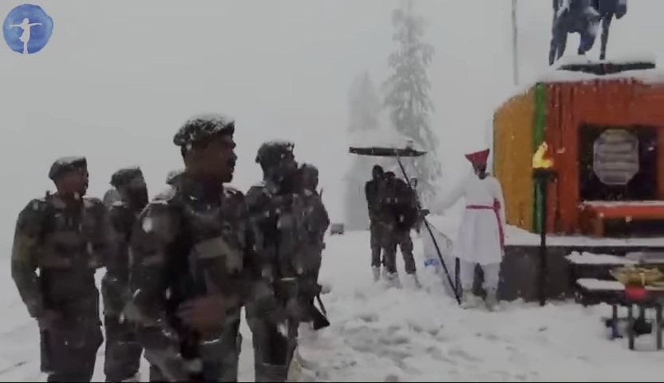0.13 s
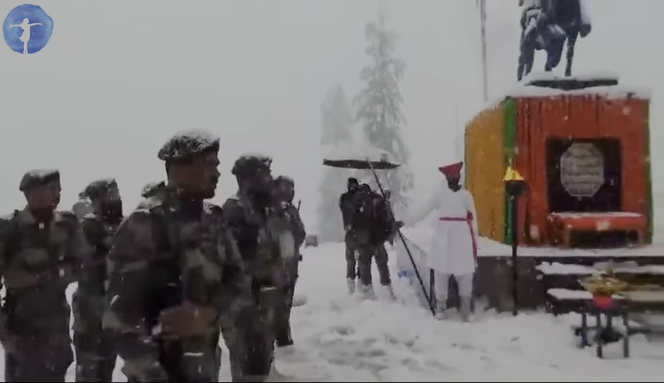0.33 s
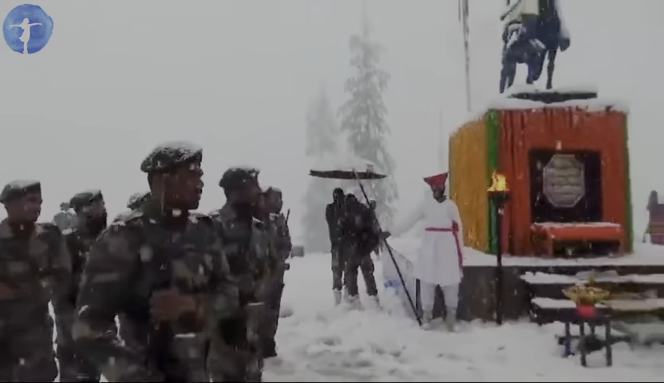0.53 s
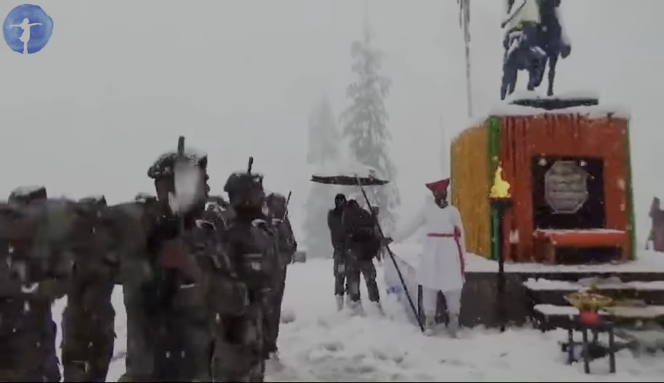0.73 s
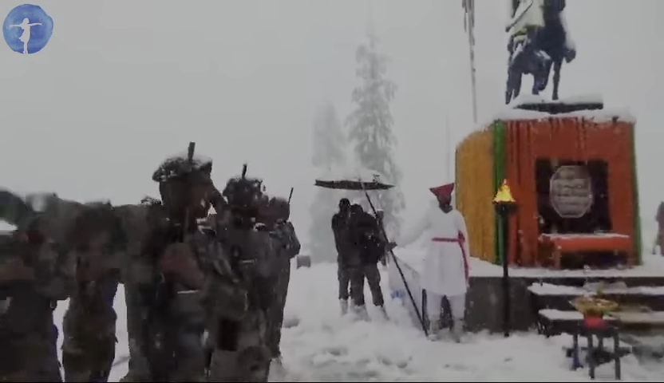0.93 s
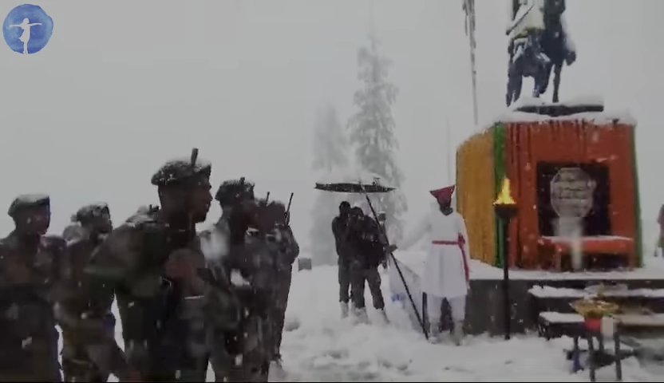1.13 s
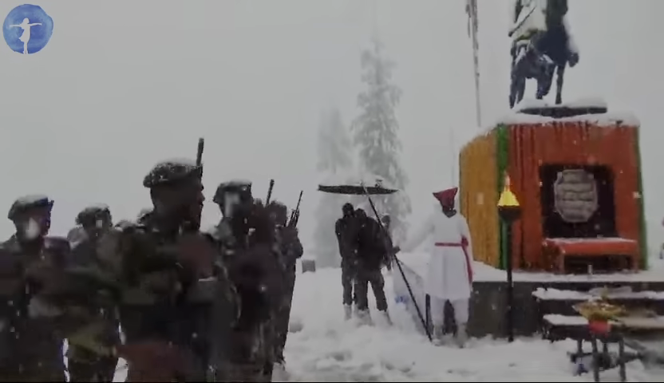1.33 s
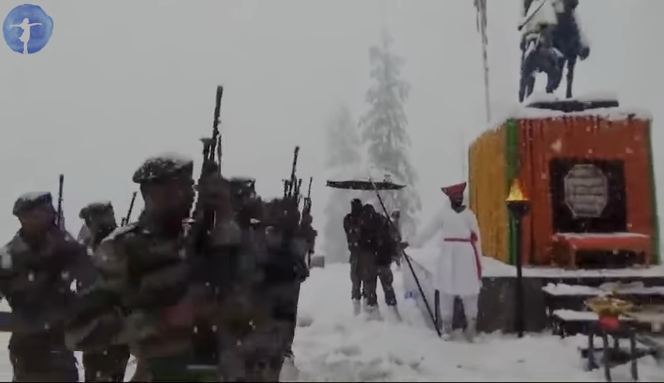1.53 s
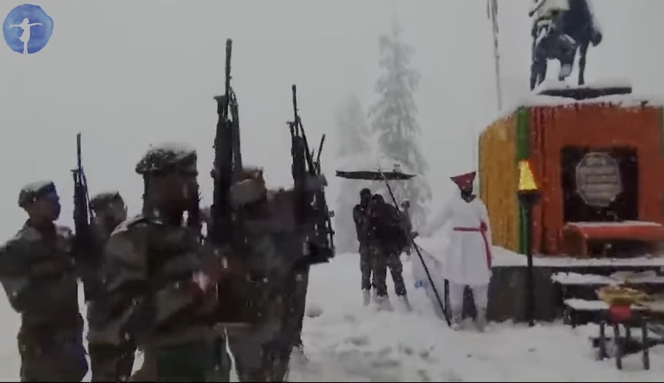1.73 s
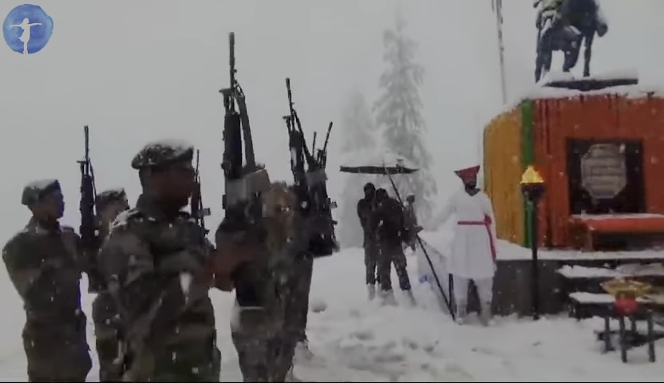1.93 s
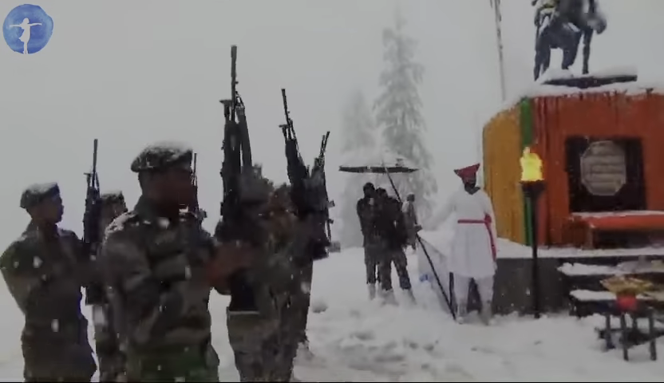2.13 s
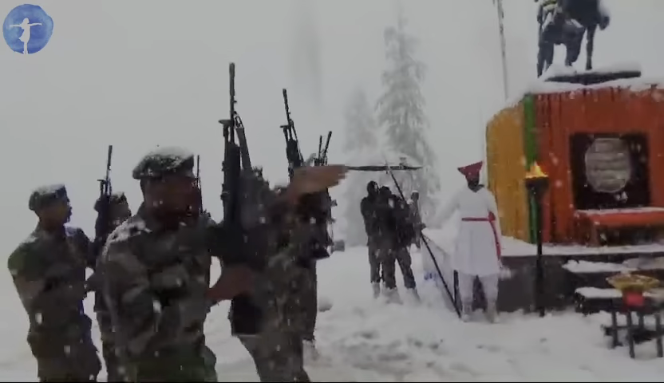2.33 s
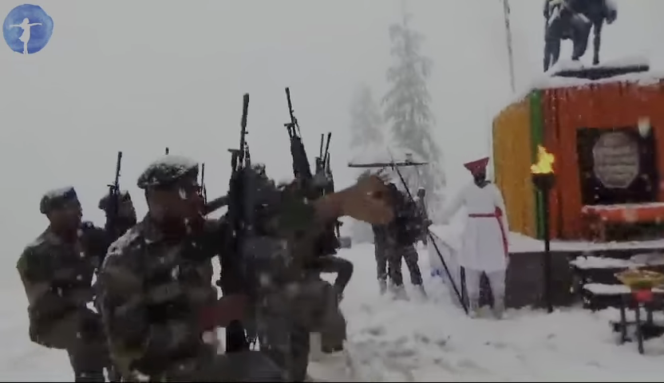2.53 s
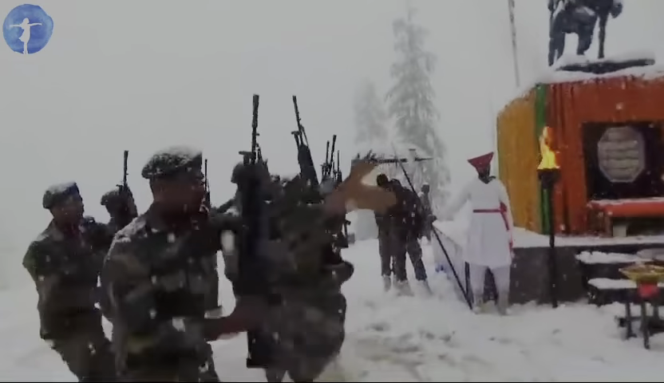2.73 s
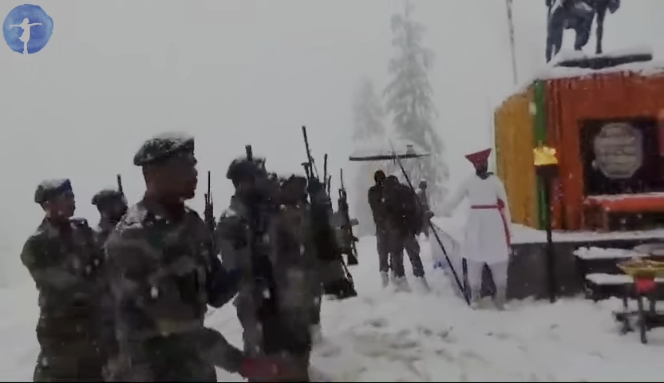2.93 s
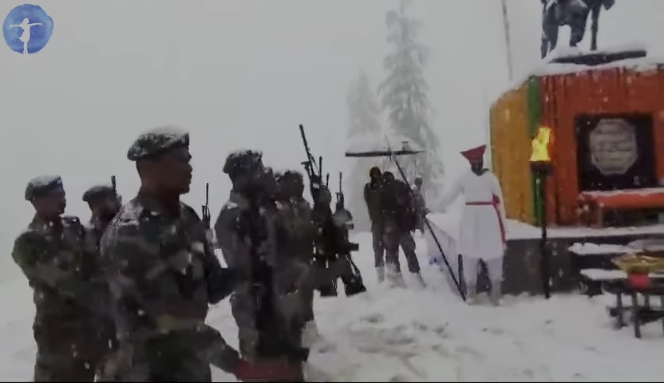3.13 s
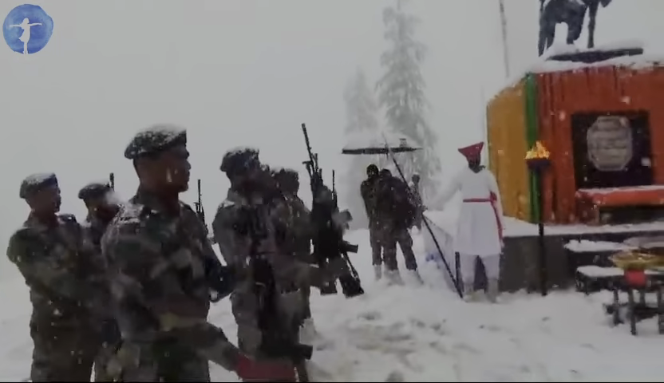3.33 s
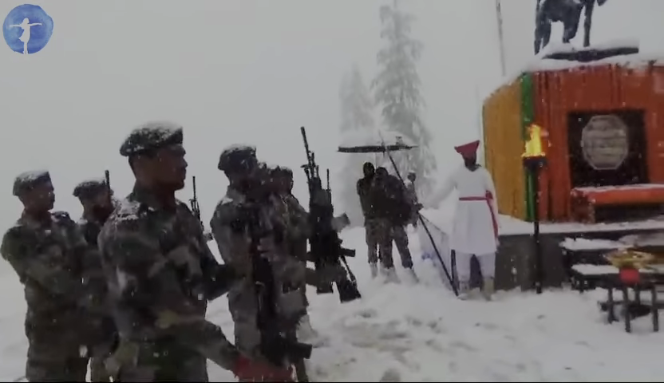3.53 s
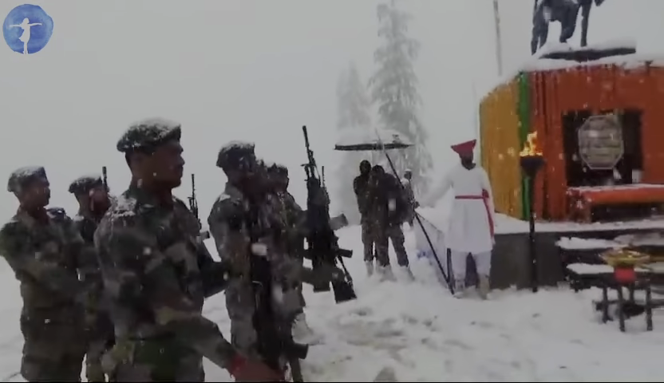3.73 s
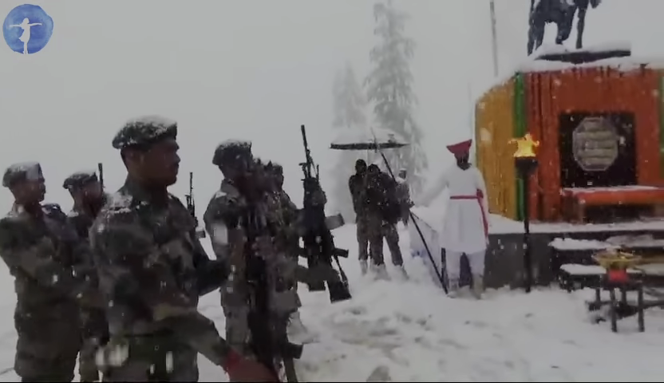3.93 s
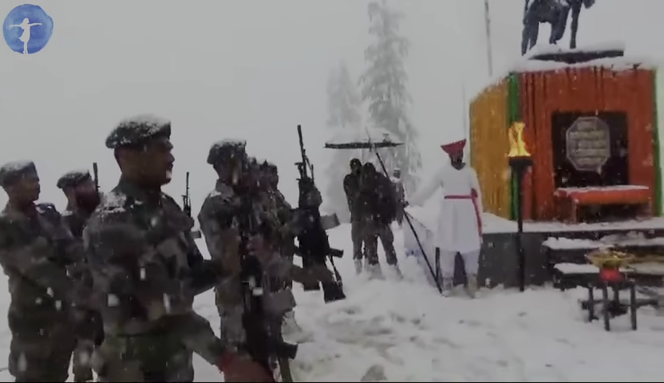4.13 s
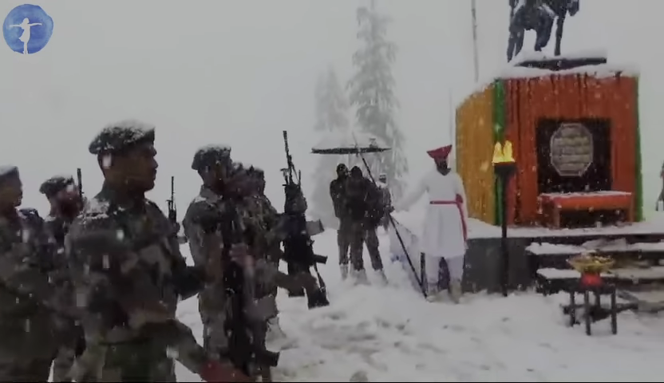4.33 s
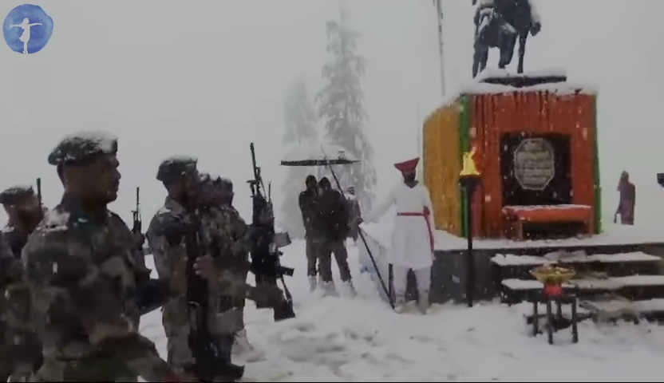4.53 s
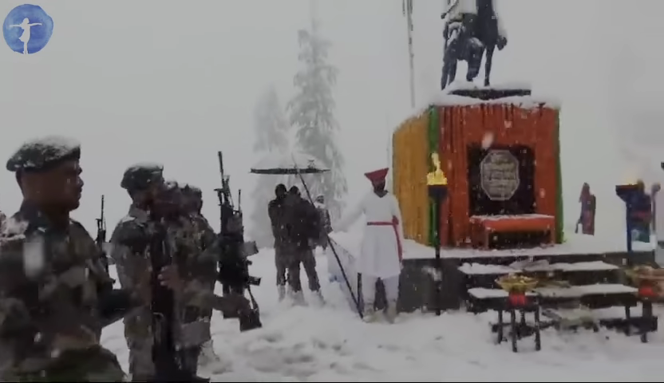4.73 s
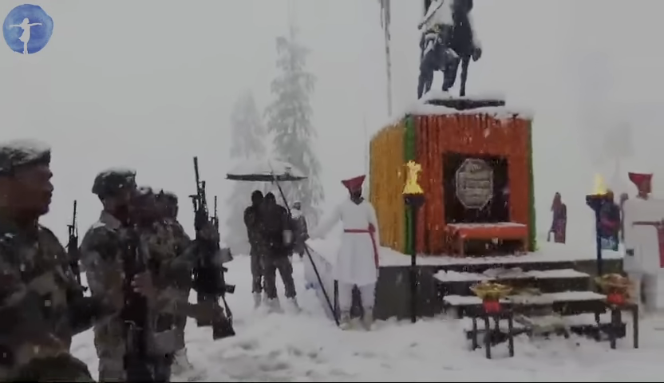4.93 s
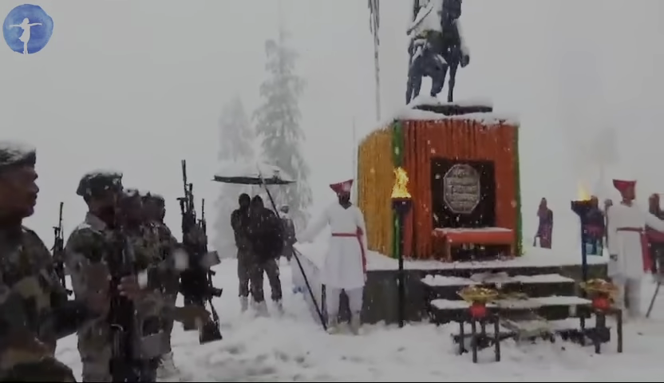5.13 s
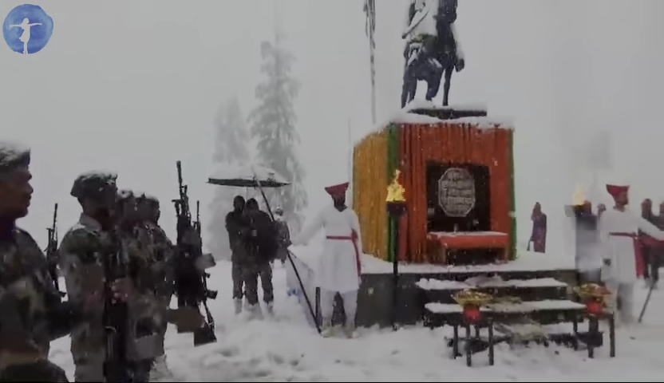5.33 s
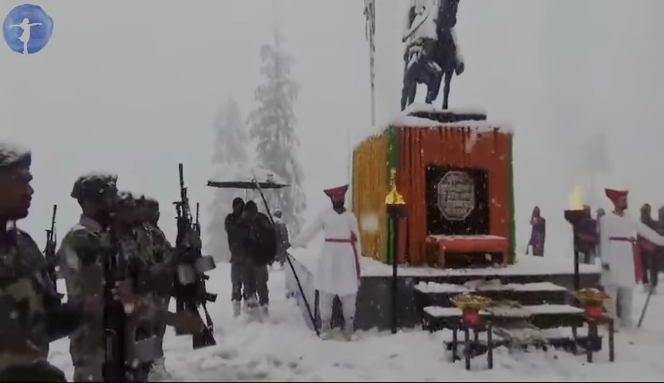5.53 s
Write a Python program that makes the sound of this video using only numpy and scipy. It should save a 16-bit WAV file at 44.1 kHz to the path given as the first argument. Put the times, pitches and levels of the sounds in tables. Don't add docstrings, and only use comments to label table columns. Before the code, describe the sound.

Several soldiers on packed snow perform a rifle drill: four dense clusters of hard hand slaps, hollow stock knocks and loose metal rattle, with small buckle ticks and cloth rustle between. The last cluster ends in a heavy boot thud. After that only light ticks, faint hiss and a low distant drone remain. Close small stereo microphone, dry, almost no echo, slightly rounded peaks.

```python
import sys
import numpy as np
from scipy import signal
from scipy.fft import rfft, irfft
from scipy.io import wavfile
from scipy.ndimage import uniform_filter1d

SR = 44100
rng = np.random.default_rng(int(sys.argv[2]) if len(sys.argv) > 2 else 0)


def dump_mix(stems):
    frames = np.atleast_2d(stems).T
    limited = np.clip(frames, -1, 1)
    pcm = np.round(limited * 32767).astype(np.int16)
    wavfile.write(sys.argv[1], SR, pcm)


def convert_level_to_amplitude(level_db):
    exponent = np.asarray(level_db, float) / 20
    return 10 ** exponent


N = 245627

# f/Hz, density/dB per Hz
AIR_SPECTRUM = [(15, -39), (25, -1.5), (64, 2), (110, -6.5), (165, -4.5), (505, -10), (1140, -11),
                (1510, -15.5), (1760, -14), (2210, -17.5), (4510, -22.5), (8100, -21), (11000, -28.5),
                (14300, -49), (22000, -120)]
# f/Hz, side minus mid/dB
AIR_WIDTH = [(60, -30), (110, -15), (190, -16.5), (350, -9.5), (630, -6), (1120, -3.5), (2020, -3),
             (3630, -2.5), (6530, -5), (11700, -9)]
# f/Hz, width/Hz, level/dB
GENERATOR_MODES = [(64.4, 6, -67), (94, 65, -69), (130, 9.9, -74), (211, 76, -65)]
# t/s, hiss level/dB, drone level/dB
BACKGROUND_GAIN = [(0, -5, -17), (.5, -5, -14), (1.0, -3, -4), (2.0, -1.5, -24), (2.7, 0.5, -11),
                   (3.3, -0.5, 0.5), (3.9, -2, 4.5), (4.401, -1, -10), (5.57, -1.5, 3)]
# t/s, level/dB
CLOTH_MOTION = [(0, -49.5), (.06, -56), (.28, -51), (.76, -49.5), (1.01, -62.5), (1.21, -35), (1.33, -59),
                (1.5, -50.5), (1.7, -43.5), (1.95, -49), (2.45, -36.5), (2.75, -49), (2.93, -32),
                (3.19, -51), (3.85, -60), (4.25, -55), (4.65, -62), (5.1, -55)]
# t/s, bright minus dull/dB
SLING_RUB = [(1.4, 2), (1.65, 4), (1.8, -7), (2.2, 8), (3.0, 3), (3.3, 13)]

# f/Hz, width/Hz, level/dB
GROUND_MODES = [(110, 68, -7), (155, 61, -2.5), (257, 157, 2), (426, 180, -3)]
STOCK_MODES = [(600, 214, 2), (684, 58, 6.5), (766, 94, 1), (865, 68, 1.5)]
PALM_MODES = [(1020, 500, -1.5), (1530, 335, -2), (1782, 694, -5)]
CRACK_MODES = [(2240, 1400, -4.5), (3000, 1030, -1.5), (4180, 1480, -4.5)]
RATTLE_MODES = [(5270, 2040, -4.5), (7530, 2450, 1), (8050, 1830, 5), (10600, 5200, -9)]
SWIVEL_MODES = [(4600, 1300, 2.5), (5900, 1300, -5), (7770, 1180, 8), (9750, 3700, -4.5)]
SNAP_MODES = [(4700, 2800, -2.5), (7850, 2300, 1), (10100, 3400, 1.5)]

# t/s, level/dB, f/Hz, sizzle relative level/dB
GEAR_TICKS = [(0.44, -24.5, 1450, -17), (0.4561, -24, 1220, -40), (0.497, -34, 1460, -30),
              (.5582, -32, 1790, -16), (0.5859, -30, 1370, -9.5), (0.661, -35, 1460, -8),
              (0.7502, -33, 1400, -27.5), (0.8003, -36, 1300, -11), (0.8368, -24, 1500, -10),
              (1.419, -31, 1580, -14), (1.592, -27, 1240, -7), (1.65, -29, 1370, -5.5),
              (1.7903, -33, 1450, -22), (1.895, -24.5, 1435, -15), (1.922, -34.5, 1560, 2.5),
              (1.995, -33.5, 1200, -10), (2.735, -31, 1446, -11), (3.1393, -27, 1170, -9.5),
              (3.203, -33.5, 1450, -19), (3.29, -41, 1900, -7), (3.333, -38.5, 1660, -4),
              (3.536, -39.5, 1900, 2), (4.1322, -34.5, 1680, -12),
              (.5407, -32.5, 2270, -27), (0.613, -29.5, 3130, -12), (.624, -27, 3370, -7),
               (.7863, -32, 2100, -27), (1.0123, -29.5, 3000, -18), (1.041, -32, 3010, -8),
               (1.3524, -35.5, 2110, 4), (1.371, -33, 2200, -28), (1.516, -25.5, 3160, -19),
               (1.5425, -20.5, 2970, 1), (1.5473, -14.5, 3050, -4.5), (1.6771, -15, 3000, -15.5),
               (1.715, -14, 2970, -13.5), (1.7307, -20, 3400, -25), (1.8037, -24.5, 3350, -18),
               (1.9127, -28, 2900, -14), (2.34, -19.5, 2960, -14), (2.592, -16, 3000, -5.5),
               (2.6247, -32, 3100, -6), (2.646, -29.5, 2260, -24), (3.213, -33.5, 2170, -14),
               (3.426, -36.5, 3510, -8), (3.463, -39, 3180, -3), (3.4803, -33.5, 2420, -3.5),
               (4.3894, -41, 2830, -16), (4.4842, -40.5, 3460, -6), (4.9555, -39.5, 3400, -7),
               (5.534, -39, 2450, -5)]
# t/s, level/dB, f/Hz, T60/s
STOCK_RINGS = [(0.1532, -22, 880, 0.038), (0.1552, -18, 661, 0.034), (0.229, -36, 690, 0.038),
               (0.2958, -40, 735, 0.022), (0.3317, -35, 593, 0.022), (0.9284, -36.5, 730, 0.02),
               (0.9823, -38.5, 720, 0.032), (1.1509, -17, 703, 0.028), (1.1728, -26, 716, 0.02),
               (1.2068, -21.5, 665, 0.11), (1.2197, -16, 667, 0.019), (1.2377, -31, 703, 0.09),
               (1.554, -30, 802, 0.024), (1.6039, -33, 674, 0.031), (1.6198, -30, 670, 0.025),
               (1.6378, -32, 800, 0.02), (1.6617, -37.5, 753, 0.057), (1.6887, -32.5, 653, 0.024),
               (1.7615, -40, 700, 0.022), (1.7914, -37, 713, 0.022), (1.8114, -35, 680, 0.022),
               (1.8323, -43, 660, 0.045), (1.8503, -25, 727, 0.016), (1.9361, -39.5, 670, 0.022),
               (2.0419, -25, 722, 0.17), (2.0588, -18, 730, 0.017), (2.0608, -14, 974, 0.016),
               (2.0748, -15, 864, 0.027), (2.0977, -18, 616, 0.024), (2.0997, -26, 842, 0.13),
               (2.1107, -15, 794, 0.022), (2.1317, -28, 875, 0.02), (2.1466, -23, 640, 0.021),
               (2.1476, -22, 824, 0.025), (2.1596, -24.5, 686, 0.059), (2.2953, -44, 690, 0.052),
               (2.3162, -25.5, 876, 0.017), (2.4459, -22, 737, 0.038), (2.4779, -42, 704, 0.067),
               (2.4958, -28, 767, 0.023), (2.5208, -20, 693, 0.021), (2.7792, -32.5, 653, 0.022),
               (2.8321, -41.5, 724, 0.15), (2.868, -24, 646, 0.031), (2.8849, -26, 817, 0.022),
               (2.9019, -22, 860, 0.027), (2.9109, -15.5, 660, 0.034), (2.9658, -24.5, 690, 0.024),
               (2.9777, -28, 680, 0.022), (3.278, -48, 700, .03), (3.405, -55, 720, .03),
               (3.53, -51, 726, 0.033)]
# t/s, level/dB, f/Hz, T60/s
MAGAZINE_RINGS = [(0.1202, -25, 1700, 0.022), (0.1222, -27, 1990, 0.02), (0.1532, -20.5, 2050, 0.025),
                  (0.1641, -22.5, 1264, 0.023), (0.1791, -24, 1990, 0.019), (0.1791, -21, 1530, 0.039),
                  (0.1801, -29, 1127, 0.066), (1.109, -23.5, 1106, 0.022), (1.1439, -24, 1150, 0.02),
                  (1.561, -29.5, 1110, 0.016), (1.6069, -32, 1190, 0.02), (1.6388, -37, 1560, 0.018),
                  (1.6488, -40, 1400, 0.036), (1.8842, -33, 1155, 0.03), (1.8852, -31.5, 1493, 0.02),
                  (2.0399, -21, 1170, 0.015), (2.0648, -15, 1574, 0.024), (2.1047, -15, 1590, 0.02),
                  (2.1207, -17, 1518, 0.035), (2.1396, -20.5, 1617, 0.04), (2.1506, -22, 1063, 0.027),
                  (2.1526, -23, 1830, 0.022), (2.1566, -22, 1580, 0.02), (2.1726, -22.5, 1850, 0.02),
                  (2.1736, -27, 1530, 0.023), (2.4439, -27, 1724, 0.039), (2.4439, -23.5, 1954, 0.021),
                  (2.4859, -32, 1550, 0.018), (2.855, -21, 2270, 0.018), (2.855, -21, 1584, 0.032),
                  (2.859, -22.5, 1197, 0.022), (2.8859, -20, 2080, 0.023), (2.9009, -23, 1100, 0.034),
                  (2.9009, -17.5, 1870, 0.021), (2.9338, -22, 1630, 0.017), (2.9358, -18, 1150, 0.02),
                  (2.9648, -25, 1537, 0.033), (2.9678, -23, 1230, 0.022), (2.9827, -26, 1060, 0.022)]
# t/s, level/dB, f/Hz, T60/s
CLINKS = [(.1561, -23, 3200, 0.028), (.8367, -40.5, 3790, 0.018), (1.116, -22, 2850, .02),
          (2.0419, -30, 2700, .022), (2.0439, -31, 3290, 0.021), (2.0798, -21, 2650, .022),
          (2.1177, -18, 3380, 0.024), (2.1287, -19, 3320, .02), (2.3162, -25, 3420, .022),
          (2.524, -42, 8060, .02), (2.624, -42, 7260, .05), (2.855, -27, 2880, .02),
          (1.117, -21, 720, 0.022), (1.127, -26, 630, .02), (1.226, -17.5, 690, .024),
          (1.594, -38, 1640, .02), (2.592, -27, 4320, .015), (1.8495, -28, 1010, .012),
          (2.594, -43, 645, .025), (2.679, -43.5, 1350, .02), (2.709, -45, 670, .02),
          (2.728, -44.5, 680, .035), (2.194, -36, 8070, .02)]
# t/s, level/dB, T60/s
METAL_SNAPS = [(.1575, -18.5, 0.052), (.255, -39.5, 0.046), (1.106, -14, .012), (1.543, -21, .01),
               (1.839, -39, .015), (2.0408, -12, 0.032), (2.194, -32, .02), (2.3182, -20.5, .02),
               (2.358, -32.5, 0.085), (2.592, -23, 0.0098), (2.936, -22, 0.017), (4.8474, -35.5, 0.023),
               (5.1098, -41.5, .01)]
# t/s, level/dB, f/Hz, T60/s, left minus right/dB
BOOT_THUDS = [(.161, -28, 183, 0.054, 1), (0.743, -48, 196, 0.14, 0.0), (0.927, -32, 142, 0.044, -0.5),
              (1.123, -23, 238, .04, -1), (1.151, -18, 228, 0.04, -3), (1.26, -42, 240, 0.048, 3),
              (2.315, -26, 170, 0.071, -1), (2.357, -33, 220, 0.076, -1), (2.4, -35.5, 110, 0.093, 0),
              (2.443, -23.5, 237, 0.03, -6), (2.493, -34, 113, 0.063, -1), (2.885, -16, 149, 0.06, 1),
              (2.92, -19, 114, .07, 1), (2.943, -23, 130, 0.052, 0), (2.9625, -4.5, 159, 0.03, -13),
              (2.983, -22, 127, 0.037, 4), (3.002, -25, 124, 0.053, -6), (3.018, -38, 155, 0.11, 3),
              (2.995, -27.5, 109, 0.11, -4.5), (2.05, -38, 109, 0.08, -2)]
# t/s, level/dB, f/Hz, T60/s, left minus right/dB
BUTT_THUDS = [(0.141, -14, 454, 0.032, 2), (0.146, -20.5, 520, 0.033, -12), (0.155, -23, 446, 0.047, -5),
              (0.179, -23.5, 457, 0.035, 1), (0.928, -32, 463, 0.029, 0.5), (1.112, -15.5, 400, 0.02, -3),
              (1.201, -23.5, 428, 0.049, 4), (1.546, -33.5, 294, 0.04, -0.5),
              (1.848, -33, 520, 0.027, -0.5), (2.038, -29.5, 354, 0.043, -0.5),
              (2.099, -23, 308, 0.038, -4), (2.156, -18, 308, 0.029, 1), (2.315, -25, 236, 0.054, 1),
              (2.908, -16, 302, 0.024, -18), (2.913, -10.5, 267, 0.038, -7), (2.939, -31, 440, 0.04, -3)]

# t/s, crack level/dB, stock relative level/dB, T60/s
GUARD_SLAPS = [(.1464, -15.5, -7, 0.051), (.1534, -12, -12, 0.046), (.1564, -8.5, -18, 0.046),
               (1.097, -15.5, -6, 0.037), (1.1134, -13, -6, 0.043), (1.1178, -8.5, -28, 0.057),
               (1.1268, -11, -2.5, 0.066), (1.154, -14, -10, 0.098), (1.1655, -7.5, -30, 0.03),
               (1.1834, -27, -4, 0.055), (1.202, -11.5, -11, .02), (1.2045, -14, -13, 0.081),
               (2.0444, -10, -10, 0.08), (2.0514, -12, -18, 0.14), (2.0772, -13.5, -4, 0.11),
               (2.0844, -13.5, 1, .08), (2.1094, -19, -8.5, 0.055), (2.1174, -8.5, -4.5, 0.08),
               (2.15, -13.5, -19, 0.062), (2.1574, -19, -10, .054), (2.194, -28, -14, 0.039),
               (2.2194, -34, -5, .026), (2.3078, -25.5, 3.5, 0.067), (2.3162, -14, -22, 0.036),
               (2.3522, -27.5, -19, 0.16), (2.898, -12, -14, 0.07)]
PALM_SLAPS = [(.1409, -15.5, -11, 0.048), (.179, -15.5, -4, 0.095), (1.1057, -12, -27, 0.046),
              (1.1334, -19, 4, .06), (1.1448, -13.5, -3.5, 0.097), (1.222, -24.5, 3.5, 0.12),
              (1.8499, -20.5, 3.5, 0.029), (2.0401, -14, -20, 0.048), (2.0618, -11.5, 1.5, 0.066),
              (2.0668, -11.5, -22, 0.1), (2.0984, -13, -15, 0.26), (2.164, -20, -2, 0.052),
              (2.174, -17.5, -12, 0.026), (2.4484, -21.5, 1.5, 0.051), (2.5197, -24, -2, 0.037),
              (2.9066, -14, 0, 0.093), (2.9164, -16, -10, 0.1), (2.9355, -13.5, -15, 0.06),
              (2.9657, -17.5, -13, 0.051), (2.9834, -26, -15, 0.093)]
TIGHT_GRIPS = [(.1212, -23, -5, 0.23), (1.175, -19, -10, 0.044), (1.258, -22, -5, 0.039),
               (1.5456, -21.5, -11, 0.056), (2.1071, -17, -11, .082), (2.1406, -11.5, -4, 0.054),
               (2.4945, -23.5, 2, 0.051), (2.856, -12, -19, 0.083), (2.3165, -19, -20, 0.02),
               (2.8862, -14.5, -0.5, 0.084), (2.9454, -17.5, -8, 0.12), (3.0394, -37, -9, 0.18),
               (3.075, -31, -27, 0.046), (2.4438, -17.5, -9, .032)]
REGRIPS = [(.217, -34.5, 10.5, 0.068), (.2512, -34.5, 4, 0.13), (.9816, -49.5, 14.5, 0.092),
           (1.5557, -37, 0.5, 0.033), (1.6042, -35, 2, .051), (1.6175, -35, 2, 0.078),
           (1.6382, -39, -5, 0.061), (1.6628, -42.5, 3, 0.068), (1.81, -47.5, 13.5, 0.21),
           (1.8834, -33.5, -14, 0.049), (2.7746, -45.5, 10, 0.089), (3.0044, -35, -16, 0.12) ]
# palm level/dB, rattle level/dB
GUARD_MIX, PALM_MIX = (-8.5, -8.5), (-2, -7)
TIGHT_MIX, REGRIP_MIX = (-3.5, -18), (4.2, -11)

AIR_DB = -52.5
TICK_T60_S, TICK_RING_DB, TICK_MUFFLE_PER_DB = 0.018, -6.5, -0.14
PORT_LAG_RAD, PORT_HZ = 0.56, 600
TOP_HZ = 11000
LEFT_RIGHT = np.array([[1], [-1]])


def level(x, db):
    return x * convert_level_to_amplitude(db) / np.sqrt(np.mean(x ** 2))


def ring(x, hz, width):
    return signal.lfilter(*signal.iirpeak(hz, hz / width, fs=SR), x)


def wander(hold, smooth):
    steps = np.repeat(rng.standard_normal(N // hold + 1), hold)
    return uniform_filter1d(steps, smooth)[:N]


def body(modes, drive, side_db, grit_db=0., snap_db=-90.):
    grit = np.repeat(rng.standard_normal(N // 40 + 1), 40)[:N]
    noise = rng.standard_normal((2, N)) * convert_level_to_amplitude(grit_db * grit)
    contact = np.maximum(np.diff(drive, 2, prepend=[0, 0]), 0)
    force = noise * drive
    force[0] += convert_level_to_amplitude(snap_db) * contact
    push = np.vstack([force, noise[:1]])
    total = 0
    for k, (hz, width, db) in enumerate(modes):
        mode = ring(ring(push, hz, 2 * width), hz, width)
        total = total + (-1) ** k * convert_level_to_amplitude(db) * mode
    mid, side, steady = total
    return (mid + convert_level_to_amplitude(side_db) * side * LEFT_RIGHT) / steady.std()


def blows(times, dbs, t60s, rise, tail_db):
    power, t = np.zeros(N + SR), np.arange(SR // 2) / SR
    for s, db, t60 in zip(times, dbs, t60s):
        t60 = max(t60, .005)
        fall = convert_level_to_amplitude(-120 * t / t60) + convert_level_to_amplitude(2 * tail_db - 120 * t / (3.9 * t60))
        start = int(s * SR)
        power[start:start + len(t)] += convert_level_to_amplitude(2 * db) * fall * np.minimum(t / rise, 1) ** 2
    return np.sqrt(power[:N])


def knocks(times, dbs, hzs, t60s, pan_dbs, rise):
    out, t = np.zeros((2, N + SR)), np.arange(SR // 4) / SR
    for s, db, hz, t60, pan_db in zip(times, dbs, hzs, t60s, pan_dbs):
        envelope = convert_level_to_amplitude(db - 60 * t / max(t60, .005)) * np.minimum(t / rise, 1)
        tone = np.sin(2 * np.pi * hz * t) * envelope
        start = int(s * SR)
        out[:, start:start + len(t)] += tone * convert_level_to_amplitude(pan_db / 2 * LEFT_RIGHT)
    return out[:, :N]


def outdoor_hiss():
    log_f = np.log(np.maximum(np.fft.rfftfreq(N, 1 / SR), 1))
    hz, db = np.transpose(AIR_SPECTRUM)
    colour = convert_level_to_amplitude(np.interp(log_f, np.log(hz), db))
    hz, db = np.transpose(AIR_WIDTH)
    apart = convert_level_to_amplitude(np.interp(log_f, np.log(hz), db))
    mid, side = irfft(rfft(rng.standard_normal((2, N))) * colour * np.array([np.ones_like(apart), apart]), N)
    return level(mid + side * LEFT_RIGHT, AIR_DB) * convert_level_to_amplitude(0.74 * wander(3000, 3000))


def generator():
    drone = sum(level(ring(rng.standard_normal(N), hz, w), db) for hz, w, db in GENERATOR_MODES)
    return drone * convert_level_to_amplitude(4.5 * wander(6000, 6000))


def air():
    s, hiss_db, drone_db = np.transpose(BACKGROUND_GAIN)
    t = np.arange(N) / SR
    hiss = outdoor_hiss() * convert_level_to_amplitude(np.interp(t, s, hiss_db))
    return hiss + generator() * convert_level_to_amplitude(np.interp(t, s, drone_db))


def rustle():
    t = np.arange(N) / SR
    busy_db = np.interp(t, *np.transpose(CLOTH_MOTION))
    bright_db = np.interp(t, *np.transpose(SLING_RUB))
    dull_drive = convert_level_to_amplitude(busy_db - bright_db / 2 + 3.64 * wander(500, 400) - 3.5)
    bright_drive = convert_level_to_amplitude(busy_db + bright_db / 2 + 2.67 * wander(500, 400) - 10.5)
    dull = body(GROUND_MODES[2:] + STOCK_MODES + PALM_MODES, dull_drive, -19.0, grit_db=4.5)
    bright = body(CRACK_MODES[1:] + RATTLE_MODES, bright_drive, -9.5, grit_db=3.5)
    return dull + bright


def ticks():
    s, db, hz, sizzle_db = np.transpose(GEAR_TICKS)
    t60 = np.full(len(s), TICK_T60_S)
    ring_db = TICK_RING_DB + TICK_MUFFLE_PER_DB * (-15 - db)
    pan_db = 3.1 * rng.standard_normal(len(s))
    tones = knocks(s, db + ring_db, hz, 0.99 * t60, pan_db, 0.00039)
    click_drive = blows(s, db - 16.0, 0.93 * t60, 0.0005, -9.5)
    click = body(PALM_MODES + CRACK_MODES, click_drive, -12.5, snap_db=34)
    sizzle_drive = blows(s, db + sizzle_db + 0.28, 0.51 * t60, .0003, -12.0)
    sizzle = body(SWIVEL_MODES, sizzle_drive, -12.0, snap_db=29.5)
    return tones + click + sizzle


def snaps():
    s, db, t60 = np.transpose(METAL_SNAPS)
    return body(SNAP_MODES, blows(s, db, t60, 0.00024, -20), -14, snap_db=23)


def clear_rings():
    out = 0
    for table, boost_db, rise in ((STOCK_RINGS, 6.0, .003), (MAGAZINE_RINGS, 6.0, .003), (CLINKS, 5.0, .002)):
        s, db, hz, t60 = np.transpose(table)
        pan_db = 2.1 * rng.standard_normal(len(s))
        out = out + knocks(s, db + boost_db, hz, 1.47 * np.minimum(t60, .075), pan_db, rise)
    return out


def thuds():
    out = 0
    for table, rise in ((BOOT_THUDS, .006), (BUTT_THUDS, .002)):
        s, db, hz, t60, pan_db = np.transpose(table)
        out = out + knocks(s, db + 3, hz, t60, np.clip(pan_db, -4, 4), rise)
        out = out + body(GROUND_MODES, blows(s, db - 13, 1.36 * t60, rise, -8.0), -9.0)
    return out


def slaps():
    kinds = ((GUARD_SLAPS, GUARD_MIX), (PALM_SLAPS, PALM_MIX), (TIGHT_GRIPS, TIGHT_MIX), (REGRIPS, REGRIP_MIX))
    rows = [tuple(row) + mix for table, mix in kinds for row in table]
    s, db, stock_db, t60, palm_db, rattle_db = np.transpose(rows)
    crack_drive = blows(s, db - 9, 0.87 * t60, 0.0004, -15.5)
    rattle_drive = blows(s, db + rattle_db + 1.5, 0.88 * t60, 0.001, -20.0)
    palm_drive = blows(s, db + palm_db - 4.0, 0.83 * t60, 0.00093, -14.5)
    stock_drive = blows(s, db + stock_db - 9.5, 0.79 * t60, 0.00055, -7.5)
    crack = body(CRACK_MODES, crack_drive, -10.5, grit_db=3.5, snap_db=38.5)
    rattle = body(RATTLE_MODES, rattle_drive, -12.0, grit_db=3.5, snap_db=26)
    palm = body(PALM_MODES, palm_drive, -12.0, grit_db=3.0, snap_db=46.5)
    stock = body(STOCK_MODES, stock_drive, -11.5, grit_db=4.0, snap_db=50.0)
    return crack + rattle + palm + stock


def scene():
    squad = slaps() + thuds() + ticks() + rustle() + clear_rings() + snaps()
    hz = np.fft.rfftfreq(N, 1 / SR)
    lag = PORT_LAG_RAD / (1 + (hz / PORT_HZ) ** 2)
    return irfft(rfft(squad) * np.exp(-.5j * lag * LEFT_RIGHT), N) + air()


def band_limit(x):
    return signal.sosfilt(signal.butter(12, 12330, fs=SR, output="sos"), x)


def record(dry):
    rounded = np.tanh(0.56 * dry) / 0.65
    top_cut = signal.ellip(12, .3, 70, TOP_HZ, fs=SR, output="sos")
    mix = signal.sosfilt(top_cut, rounded)
    return band_limit(mix)


dry = scene()
out = record(dry)
dump_mix(out)
```